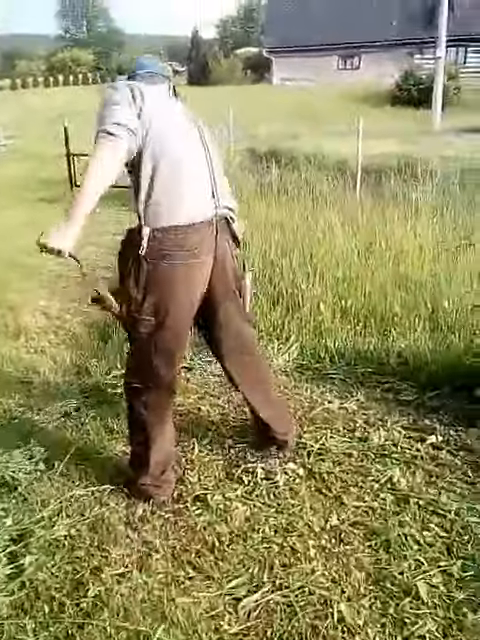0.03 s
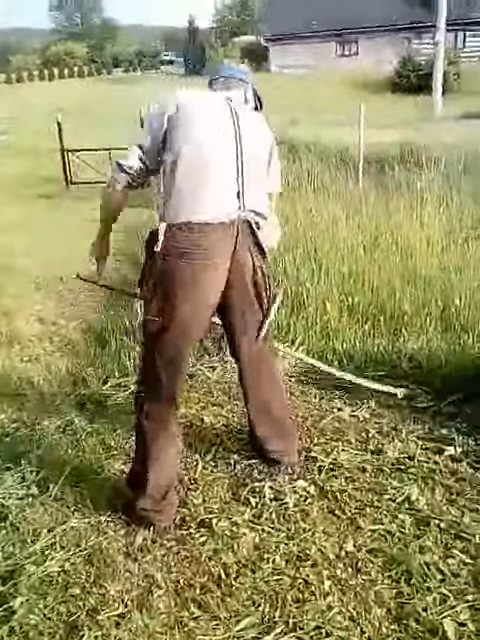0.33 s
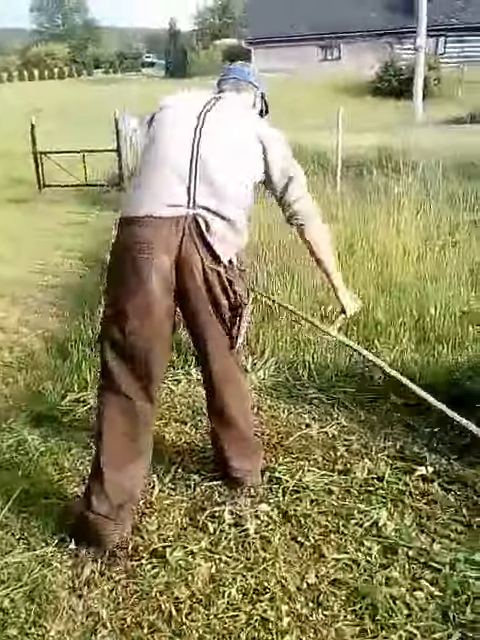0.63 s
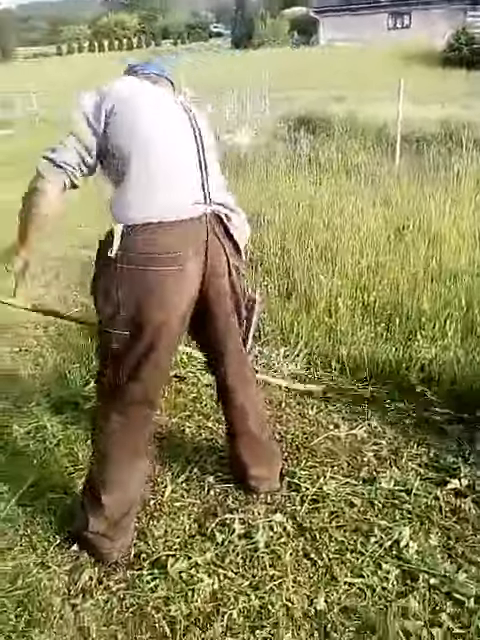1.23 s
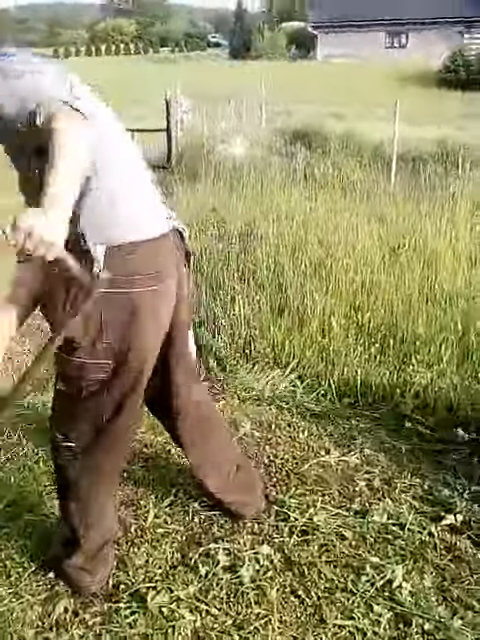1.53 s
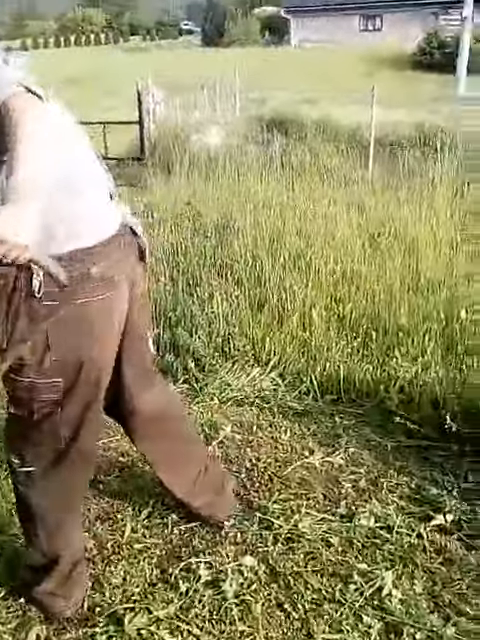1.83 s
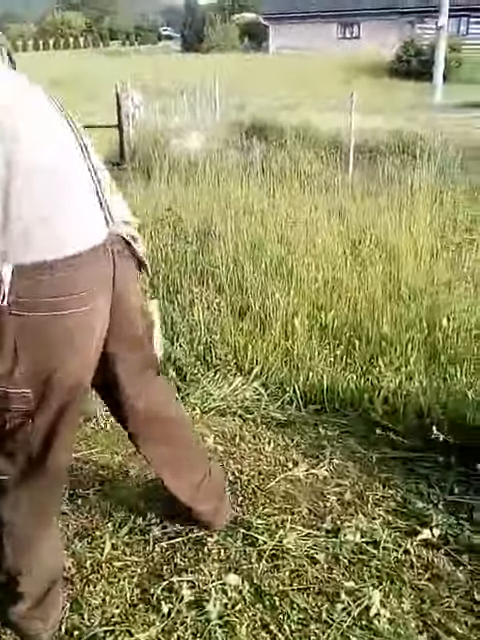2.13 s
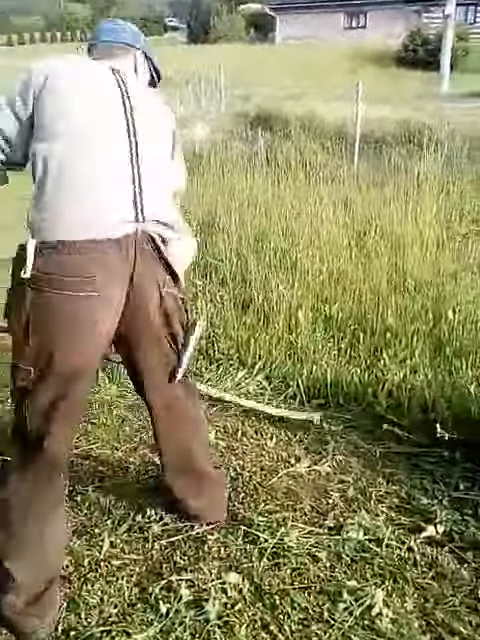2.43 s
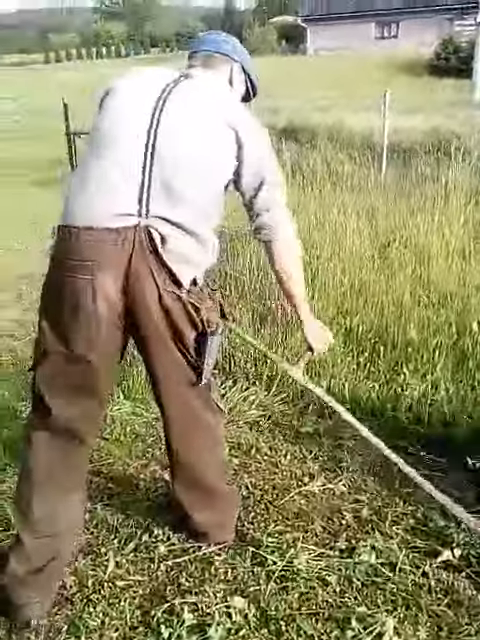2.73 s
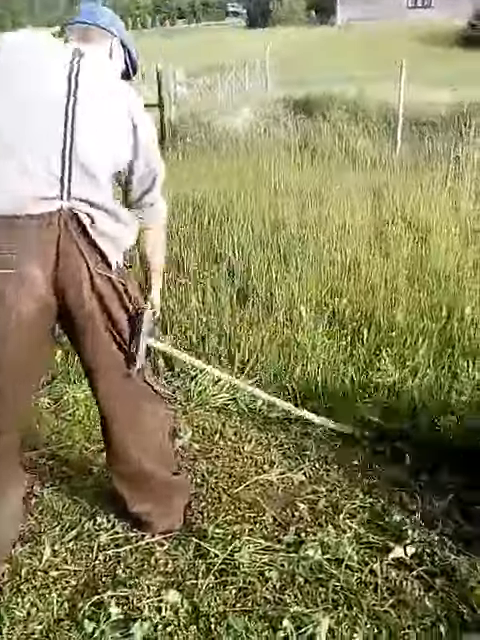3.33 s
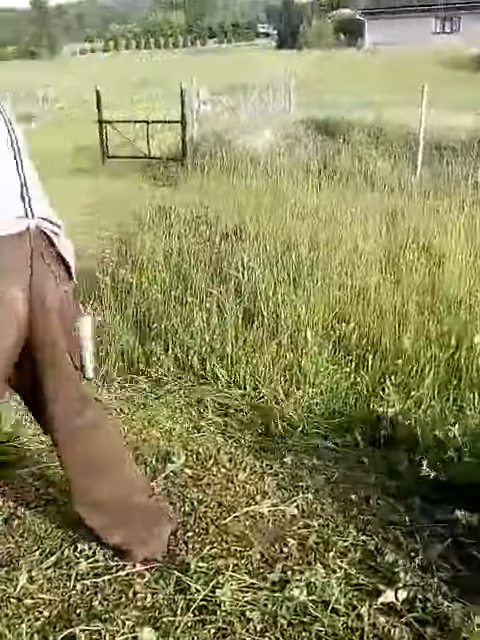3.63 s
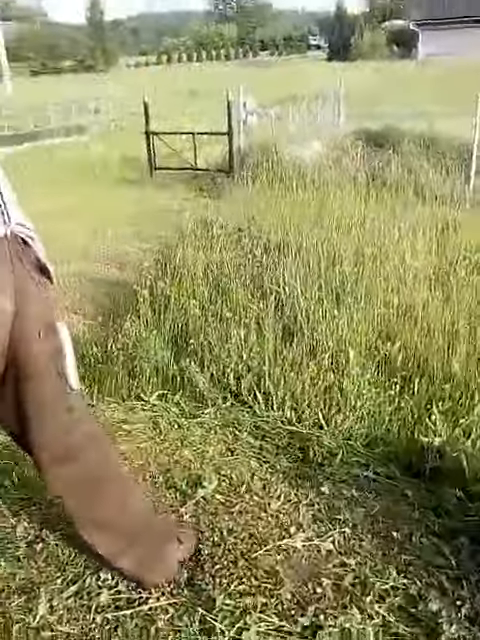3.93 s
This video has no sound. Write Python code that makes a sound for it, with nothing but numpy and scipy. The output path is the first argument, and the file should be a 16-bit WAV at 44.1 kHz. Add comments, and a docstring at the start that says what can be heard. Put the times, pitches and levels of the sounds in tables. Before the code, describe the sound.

A scythe cuts through tall grass twice with a crisp hiss and rustle, the second stroke louder. Crickets chirp in the meadow, wind gusts rumble on the microphone early on, and a dry stalk cracks at the end.

```python
"""In a meadow, gusts buffet the microphone and crickets chirp nearby, over a faint far chorus.
About a second in, a scythe goes through the tall grass: stems snap in a dense hiss and set the thin
blade ringing, and the cut swath rustles as it is swept aside. Another gust passes, then the blade is
drawn back over the stubble. The second, louder cut comes just after three seconds, and near the end
a dry stalk cracks."""
import sys
import numpy as np
from scipy import signal
from scipy.io import wavfile

SR = 44100
rng = np.random.default_rng(int(sys.argv[2]) if len(sys.argv) > 2 else 0)


def materialize(psi):
    """Save the field psi as 16-bit PCM at rate SR to the path in sys.argv[1].

    A 1-D psi becomes a single channel; in a 2-D psi each row is a channel.
    """
    bounded = np.clip(np.atleast_2d(psi).T, -1, 1)
    quanta = np.round(bounded * 32767).astype(np.int16)
    wavfile.write(sys.argv[1], SR, quanta)


N = 176400

# Stereo image at the microphone. Each row: frequency in Hz, likeness of left and right from 0 to 1.
STEREO_LIKENESS = [(3400, 1), (4200, 1), (5500, 0.5), (9000, 0.4)]
# Still air over the meadow. Each row: frequency in Hz, relative level in dB.
AIR_SPECTRUM = [(25, 8), (100, -3), (300, 2.5), (900, -10.5), (1800, -54), (4000, -22), (6000, -14.5),
                (8000, -27), (13000, -26)]
# Strength of the wind at the microphone. Each row: time in seconds, relative level in dB.
GUST_CURVE = [(0, -31), (.03, -43), (.07, -57.5), (.14, -42), (.2, -57.5), (.275, -44), (.295, -39),
              (.48, -49), (.52, -39), (.61, -46), (.64, -41), (.7, -49), (.79, -36.5), (.92, -40),
              (.99, -54), (1.04, -53), (1.08, -70), (1.14, -53), (1.22, -74), (1.31, -64.5), (1.43, -43.5),
              (1.66, -69.5), (1.77, -55.5), (1.83, -53), (1.9, -39.5), (1.98, -44.5), (2.26, -78.5),
              (2.44, -69.5), (2.7, -71.5), (2.98, -56.5), (3.83, -68), (4.0, -78)]
# The wind's rumble and its small eddies. Each row: frequency in Hz, relative level in dB.
RUMBLE_SPECTRUM = [(25, -19.5), (40, -12), (60, 0), (105, 4), (160, -3.5), (220, -12.5), (320, -28.5),
                   (500, -45), (900, -68.5)]
EDDY_SPECTRUM = [(130, -6), (220, 11.5), (370, -4), (520, -14), (900, -38.5), (1500, -54.5)]
# Buffets on the microphone. Each row: middle in seconds, relative level in dB, pitch in Hz.
WIND_BUFFETS = [(0.018, -39, 263), (0.027, -40, 245), (0.29, -30, 145), (0.342, -30, 134),
                (0.55, -33.5, 143), (0.638, -36, 178), (0.756, -34, 260), (0.784, -28, 259.3),
                (0.814, -29, 240), (0.847, -35.5, 227), (0.869, -23, 123.4), (0.925, -30, 123.5),
                (1.803, -32.5, 129), (1.841, -40, 206), (1.899, -34, 148), (1.965, -41.5, 118),
                (2.047, -36.5, 137)]
# Hiss of thin stems on the edge. Each row: time in seconds, relative level in dB.
CUTTING_CURVE = [(0, -71.5), (.18, -78.5), (.28, -71), (.31, -84.5), (.55, -80), (.96, -95.5), (1.0, -75),
                 (1.13, -76.5), (1.24, -67), (1.38, -66.5), (1.58, -72.5), (1.9, -86.5), (2.3, -78.5),
                 (2.42, -79.5), (2.68, -78), (3.05, -82), (3.16, -77.5), (3.23, -68.5), (3.33, -69.5),
                 (3.46, -65.5), (3.62, -72), (4.0, -78.5)]
# Snapping stems and their bright fizz. Each row: frequency in Hz, relative level in dB.
STEM_SPECTRUM = [(500, 7.5), (1200, 9), (1750, -5), (3000, -1), (4500, -0.5), (5400, 1.5), (6700, -11.5),
                 (7800, -22)]
FIZZ_SPECTRUM = [(5600, -11), (6700, 11), (8000, -17.5), (10000, -33)]
# Drag of grass on the blade, in cuts and backswings. Each row: time in seconds, relative level in dB.
DRAG_CURVE = [(0, -78), (.33, -77.5), (.46, -75.5), (.62, -79), (.92, -92), (.97, -83), (1.0, -66.5),
              (1.14, -63), (1.38, -64.5), (1.55, -68), (1.85, -81.5), (2.2, -75), (2.47, -71.5),
              (2.66, -69.5), (3.05, -81), (3.15, -73), (3.22, -57.5), (3.28, -56), (3.42, -58), (3.66, -72),
              (3.78, -67), (4.0, -73)]
# Ring of the hollow stalks. Each row: frequency in Hz, relative level in dB.
STALK_SPECTRUM = [(1400, -4), (1750, 3.5), (2200, 4), (2600, 4), (2900, 3), (3400, 2.5), (4400, -3.5),
                  (5200, -2), (6800, -6.5), (8000, -40)]
# Resonances of the blade. Each row: frequency in Hz, width in Hz, relative level in dB.
BLADE_MODES = [(1894, 55, -8.5), (2493, 61, -3), (3348, 55, 3), (3587, 36, -2.5), (3815, 350, -5),
               (4150, 100, 0.5), (4490, 120, -2.5)]
# Rustle at ground level, first stubble, then swath. Each row: time in seconds, relative level in dB.
STUBBLE_CURVE = [(0, -87), (.2, -70), (.33, -72.5), (.56, -65), (.7, -76)]
SWATH_CURVE = [(0.95, -69.5), (1.27, -62.5), (1.34, -51.5), (1.72, -73), (2.27, -90), (2.74, -72.5),
               (3.06, -94), (3.23, -58.5), (3.56, -54.5), (3.68, -70), (3.77, -55.5), (4.0, -72)]
# Tone of that rustle. Each row: frequency in Hz, relative level in dB.
SWATH_SPECTRUM = [(120, -8), (250, -1), (450, -1.5), (720, 0.5), (1100, 5), (1400, -11.5), (1800, -13.5),
                  (3000, -13.5)]
# Handle, boots and thick stalks.
# Each row: start in seconds, peak in dB, pitch in Hz, seconds to die away by 60 dB.
DULL_KNOCKS = [(0.159, -48, 600, 0.11), (0.728, -47.5, 740, 0.021), (1.336, -45.5, 780, 0.095),
               (2.381, -57, 1230, 0.1), (2.746, -53, 576, 0.094), (3.719, -49.5, 890, 0.029),
               (3.734, -47.5, 364, 0.037), (3.77, -51.5, 1120, 0.11)]
# Crickets chirping around the microphone, one of them farther off. # Each row: first and last syllable in
# seconds, relative level in dB, pitch in Hz.
CRICKET_CHIRPS = [(0.171, 0.265, -57, 4380), (0.610, 0.744, -53.5, 4425), (1.242, 1.339, -56, 4430),
                  (1.652, 1.734, -56.5, 4335), (2.215, 2.355, -52.5, 4403), (2.971, 3.104, -58.5, 4380),
                  (0.578, 0.668, -66, 4850), (1.786, 1.839, -71, 4610), (2.992, 3.118, -60.5, 4740),
                  (3.654, 3.736, -60, 4780)]
# Far crickets overlap in a twitter. Each row: middle and half length in seconds, level in dB.
FAR_TWITTERS = [(1.798, 0.039, -65), (2.34, .04, -70)]
# Whistly swishes outside the cuts.
# Each row: middle and half length in seconds, level in dB, pitch in Hz, fall in Hz per second.
BACKSWING_SWISHES = [(0.474, 0.056, -72.5, 3580, 2031), (0.477, 0.037, -77, 2660, 0),
                     (2.375, 0.021, -69.5, 3900, 16000), (2.667, 0.095, -70.5, 3600, 2400),
                     (2.88, 0.057, -70, 3760, 7500)]
# The blade bites into a tuft.
# Each row: middle and half length in seconds, level in dB, pitch in Hz, fall in Hz per second.
TUFT_BITES = [(0.979, 0.03, -77.5, 2100, -4), (1.117, 0.065, -65.5, 3950, 7000),
              (1.38, 0.016, -65.5, 2650, 2000), (3.296, 0.046, -56, 3956, 8000)]
# Dry stalks cracking. Each row: time in seconds, peak in dB, pitch in Hz.
STALK_CRACKS = [(2.7482, -51.5, 740), (3.8357, -38, 906)]

# A growth is the dB a layer gains for each dB of its curve, counted from the curve's reference level.
STRONG_GUST_DB, FULL_CUT_DB, FULL_DRAG_DB = -36.5, -66.5, -54
EDDY_GROWTH, FIZZ_GROWTH, STALK_GROWTH, BLADE_GROWTH = 1.93, 2.75, 1.15, 1.19
STEMS_PER_S, STEM_SPREAD_DB, STALKS_PER_S, STALK_SPREAD_DB = 7200, 4, 3900, 5.5
SYLLABLE_SPACING_S, SYLLABLE_HALF_S, SYLLABLE_SAG_HZ_PER_S = 0.045, 0.0064, 24000
SYLLABLE_RISE_HZ, CRESCENDO_DB, CHIRP_SLOWING = 54, 1.16, 1.1
SCATTER_DB, SCATTER_T60_S = -3, 0.17
TIME = np.arange(N) / SR


def from_db(db):
    """Decibels to gain."""
    return 10 ** (np.asarray(db) / 20)


def rms_one(x):
    """Scale to unit power."""
    return x / np.sqrt(np.mean(x ** 2) + 1e-20)


def in_time(curve):
    """A curve, read at every sample."""
    return np.interp(TIME, *np.transpose(curve))


def at_hz(spectrum, hz):
    """A spectrum, read on a log frequency axis."""
    frequencies, values = np.transpose(spectrum)
    return np.interp(np.log(hz), np.log(frequencies), values)


def drift(rate_hz):
    """A smooth random wander with a spread of 1."""
    step, settle = 40, 2000
    pole = np.exp(-2 * np.pi * rate_hz * step / SR)
    noise = rng.standard_normal(N // step + settle + 2)
    slow = signal.lfilter([1], [1, -2 * pole, pole * pole], noise)[settle:]
    return np.interp(np.arange(N) / step, np.arange(len(slow)), rms_one(slow))


def swell(middle_s, half_s):
    """A bell-shaped rise and fall."""
    return np.exp(-((TIME - middle_s) / half_s) ** 2 / 2)


def resonate(x, hz, width_hz):
    """One resonance with a gain of 1 at its peak."""
    radius = np.exp(-np.pi * width_hz / SR)
    feedback = [1, -2 * radius * np.cos(2 * np.pi * hz / SR), radius ** 2]
    return signal.lfilter(np.array([1, 0, -1]) * (1 - radius ** 2) / 2, feedback, x + 1e-18)


def sliding(drive, middle_s, hz, fall_hz_per_s, width_hz):
    """A resonance that slides through hz at middle_s, at unit power."""
    age = TIME - middle_s
    carrier = np.exp(2j * np.pi * (hz - fall_hz_per_s * age / 2) * age)
    lowpass = signal.butter(2, width_hz / 2, fs=SR, output="sos")
    return rms_one((carrier * signal.sosfilt(lowpass, drive / carrier + 1e-18)).real)


def grains(per_s, spread_db):
    """Random tiny snaps of uneven size and sign."""
    sizes = from_db(spread_db * np.minimum(rng.exponential(1, N), 4)) * rng.choice([-1, 1], N)
    return rms_one(sizes * (rng.random(N) < per_s / SR))


def coloured(drives, spectrum, flicker_db):
    """Two drives dealt in turn to flickering third-octave bands; only the treble is wide."""
    out, edges = np.zeros((2, N)), 22 * 2 ** (np.arange(29) / 3)
    side_noise = rng.standard_normal((2, N))
    for k, (low, high) in enumerate(zip(edges, edges[1:])):
        hz, flicker = np.sqrt(low * high), drift(21.3)
        if high < spectrum[0][0] or low > spectrum[-1][0]:
            continue
        bandpass = signal.butter(2, [low, high], "band", fs=SR, output="sos")
        band = signal.sosfilt(bandpass, drives[k % 2] + 1e-18)
        if hz > STEREO_LIKENESS[0][0]:
            alike = at_hz(STEREO_LIKENESS, hz)
            side = signal.sosfilt(bandpass, side_noise[k % 2]) * [[1], [-1]]
            band = np.sqrt((1 + alike) / 2) * band + np.sqrt((1 - alike) / 2) * side
        out += from_db(at_hz(spectrum, hz) + flicker_db * flicker) * band
    return rms_one(out)


def crackle(spectrum, per_s, spread_db, flicker_db):
    """Two streams of tiny snaps, shaped to a spectrum."""
    return coloured([grains(per_s, spread_db) for _ in range(2)], spectrum, flicker_db)


def air():
    """Still air lays a faint, even hush over the meadow."""
    return from_db(-76) * coloured(rng.standard_normal((2, N)), AIR_SPECTRUM, flicker_db=2)


def wind():
    """Gusts rumble on the microphone; small eddies grow faster, large ones hit as push-pull buffets."""
    gust_db, buffets = in_time(GUST_CURVE), np.zeros(N)
    rumble = coloured(rng.standard_normal((2, N)), RUMBLE_SPECTRUM, flicker_db=5)
    eddies = crackle(EDDY_SPECTRUM, per_s=700, spread_db=2.5, flicker_db=5)
    eddy_db = -44.5 + EDDY_GROWTH * (gust_db - STRONG_GUST_DB)
    for middle, db, hz in WIND_BUFFETS:
        phase = np.pi * hz * (TIME - middle)
        buffets -= from_db(db + 4.5) * np.sin(2 * phase) / (1 + phase ** 2) ** 2
    return rumble * from_db(gust_db + 1.5) + eddies * from_db(eddy_db) + buffets


def stems():
    """Thousands of thin stems snap on the edge; at mid-stroke a bright fizz grows faster than the rest."""
    cutting_db = in_time(CUTTING_CURVE)
    snaps = crackle(STEM_SPECTRUM, STEMS_PER_S, STEM_SPREAD_DB, flicker_db=2)
    fizz = crackle(FIZZ_SPECTRUM, STEMS_PER_S, STEM_SPREAD_DB, flicker_db=2)
    fizz_db = -74 + FIZZ_GROWTH * (cutting_db - FULL_CUT_DB)
    return snaps * from_db(cutting_db + 4) + fizz * from_db(fizz_db)


def drag_gain(growth, trim_db):
    """The gain of a layer that follows the drag of the grass on the blade."""
    return from_db(FULL_DRAG_DB + growth * (in_time(DRAG_CURVE) - FULL_DRAG_DB) + trim_db)


def stalks(count=110):
    """Each hollow stalk rings for a moment at its own pitch; the higher ones spread to the sides."""
    out, pings_each = np.zeros((2, N)), int(STALKS_PER_S * N / SR / count)
    for hz in np.linspace(STALK_SPECTRUM[0][0], STALK_SPECTRUM[-1][0], count):
        when, polarity, chance = rng.random((pings_each, 3)).T
        size_db = -STALK_SPREAD_DB * np.log(chance + 0.02)
        clicks = np.zeros(N)
        clicks[(when * N).astype(int)] = np.sign(polarity - 0.5) * from_db(size_db)
        ring = from_db(at_hz(STALK_SPECTRUM, hz)) * resonate(clicks, hz, width_hz=22)
        alike = at_hz(STEREO_LIKENESS, hz)
        side = np.sqrt((1 - alike) / (1 + alike)) * rng.choice([-1, 1])
        out += ring * [[1 + side], [1 - side]]
    return rms_one(out) * drag_gain(STALK_GROWTH, trim_db=-3)


def blade(flicker_db=4):
    """The stems set the blade's modes ringing, most clearly under full load."""
    rings = np.zeros(N)
    for hz, width_hz, db in BLADE_MODES:
        level = from_db(db + flicker_db * drift(1.9))
        rings += level * resonate(grains(STEMS_PER_S, STEM_SPREAD_DB), hz, width_hz)
    bandpass = signal.butter(2, [1500, 5000], "band", fs=SR, output="sos")
    return rms_one(signal.sosfilt(bandpass, rings)) * drag_gain(BLADE_GROWTH, trim_db=-0.5)


def swath():
    """Stubble and cut grass rustle as the swath is pushed along the ground."""
    leaves = crackle(SWATH_SPECTRUM, per_s=1800, spread_db=3, flicker_db=2.5)
    rustle_db = in_time(list(STUBBLE_CURVE) + list(SWATH_CURVE))
    return leaves * from_db(rustle_db - 2.5)


def knocks():
    """Handle, boots and thick stalks give short, dull crunches."""
    out, lowpass = np.zeros(N), signal.butter(4, 1170, fs=SR, output="sos")
    for start, db, hz, t60 in DULL_KNOCKS:
        decay = (TIME >= start) * from_db(-60 * np.clip((TIME - start) / t60, 0, 4))
        burst = rng.standard_normal(N) * decay
        body = resonate(resonate(burst, hz, width_hz=hz), hz, width_hz=hz)
        knock = signal.sosfilt(lowpass, body)
        out += from_db(db) * knock / np.abs(knock).max()
    return out


def chirps():
    """Each wing stroke of a near cricket is a rough, falling tone; a chirp swells, rises and slows."""
    song = np.zeros(N)
    for first, last, db, hz in CRICKET_CHIRPS:
        count = round((last - first) / SYLLABLE_SPACING_S) + 1
        middles = first + (last - first) * np.linspace(0, 1, count) ** CHIRP_SLOWING
        for k, middle in enumerate(middles):
            sag = SYLLABLE_SAG_HZ_PER_S * (1 + 0.21 * rng.uniform(-1, 1))
            sounding = np.abs(TIME - middle) < SYLLABLE_SPACING_S / 2
            age = TIME[sounding] - middle
            pitch = hz + SYLLABLE_RISE_HZ * (k - count / 2)
            level = from_db(db + CRESCENDO_DB * (k - count)) * np.exp(-(age / SYLLABLE_HALF_S) ** 2 / 2)
            song[sounding] += level * np.sin(2 * np.pi * (pitch - sag * age / 2) * age)
    return song * (1 + 0.27 * drift(240))


def far_chorus(hz=4573, width_hz=600):
    """Far from the microphone, many crickets blur into one wavering band."""
    band = resonate(resonate(rng.standard_normal((2, N)), hz, width_hz), hz, width_hz)
    twitters = sum(from_db(db) * swell(middle, half) for middle, half, db in FAR_TWITTERS)
    return rms_one(band) * (from_db(-77.5 + drift(14)) + twitters)


def crickets(right_lag_s=0.00001):
    """Near chirps reach the microphone directly, then scattered by the meadow, over the far chorus."""
    song = chirps()
    direct = np.array([np.interp(TIME - lag, TIME, song) for lag in (0, right_lag_s)])
    tail = rng.standard_normal((2, SR // 2)) * from_db(-60 * TIME[:SR // 2] / SCATTER_T60_S)
    tail /= np.sqrt(np.sum(tail ** 2) / 2)
    scattered = signal.fftconvolve(song[None], tail, axes=1)[:, :N]
    far = from_db(SCATTER_DB) * scattered + far_chorus()
    return direct + 0.47 * far + 0.48 * far[::-1]  # the far sound sits almost in the centre


def swishes():
    """On the backswings, narrow bands of hiss swell and fade, most of them sliding down."""
    out = np.zeros(N)
    for middle, half, db, hz, fall in BACKSWING_SWISHES:
        hiss = sliding(rng.standard_normal(N), middle, hz, fall, width_hz=450)
        out += from_db(db) * swell(middle, half) * hiss
    return out


def bites():
    """Thick stalks strike the edge in a coarse rasp whose ring slides as they run along the blade."""
    out = np.zeros(N)
    for middle, half, db, hz, fall in TUFT_BITES:
        snaps = grains(per_s=900, spread_db=STEM_SPREAD_DB)
        out += from_db(db) * swell(middle, half) * sliding(snaps, middle, hz, fall, width_hz=410)
    return out


def cracks():
    """A dry stalk breaks in a single sharp pulse."""
    out = np.zeros(N)
    for middle, db, hz in STALK_CRACKS:
        phase_squared = np.minimum((np.pi * hz * (TIME - middle)) ** 2, 100)
        out += from_db(db) * (1 - 2 * phase_squared) * np.exp(-phase_squared)
    return out


def scene():
    """Wind, scythe and crickets over the quiet of the meadow."""
    return (air() + wind() + stems() + stalks() + blade() + swath() + knocks()
            + crickets() + swishes() + bites() + cracks())


def record(dry):
    """The microphone signal is cut steeply above 13 kHz."""
    return signal.sosfilt(signal.ellip(10, 0.1, 80, 13000, fs=SR, output="sos"), dry)


dry = scene()
out = record(dry)
materialize(out)
```